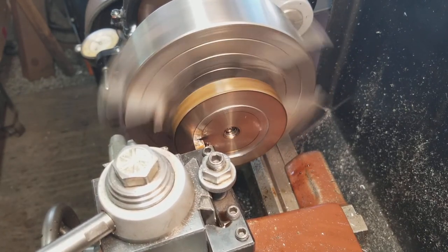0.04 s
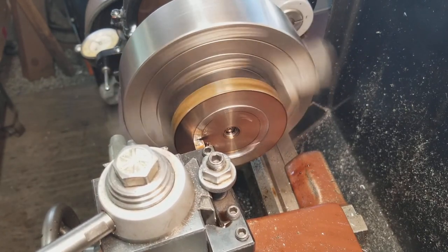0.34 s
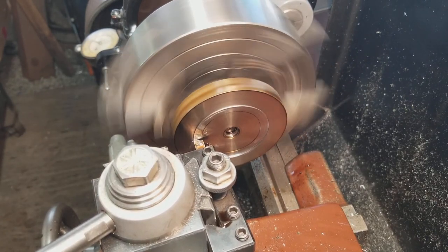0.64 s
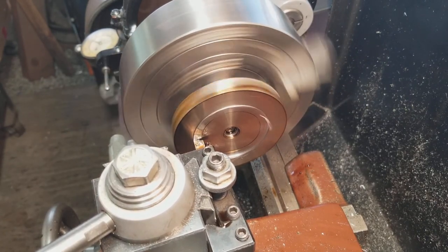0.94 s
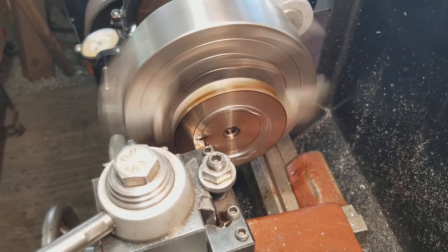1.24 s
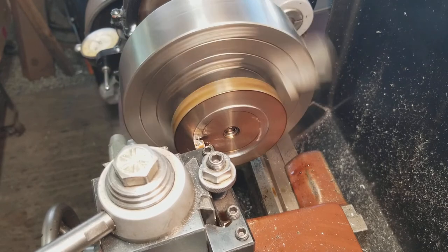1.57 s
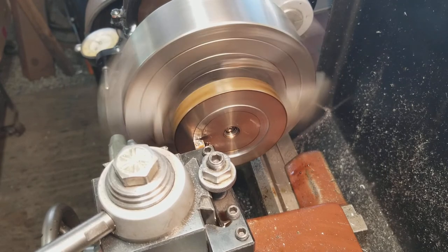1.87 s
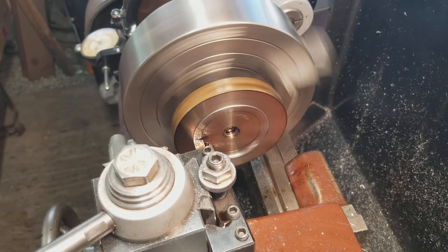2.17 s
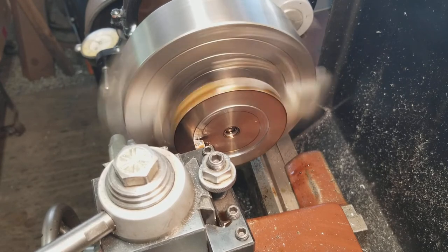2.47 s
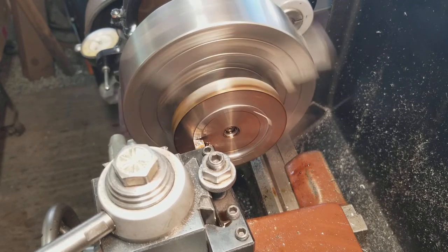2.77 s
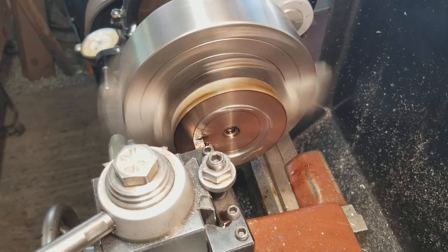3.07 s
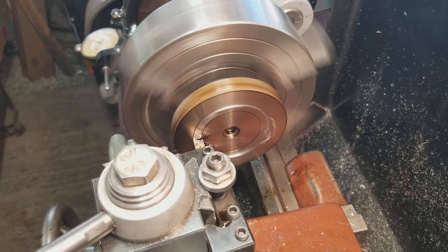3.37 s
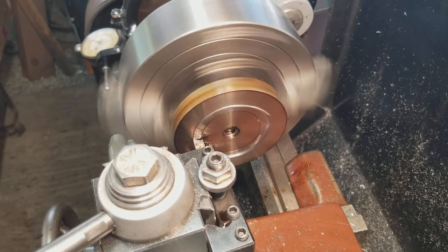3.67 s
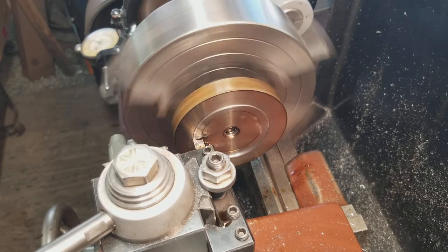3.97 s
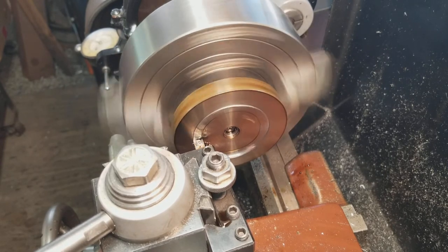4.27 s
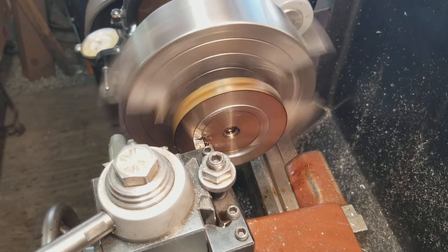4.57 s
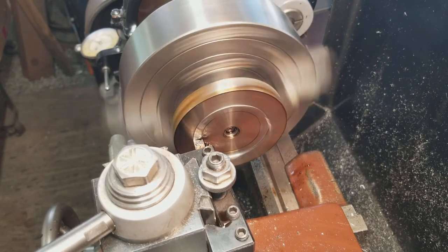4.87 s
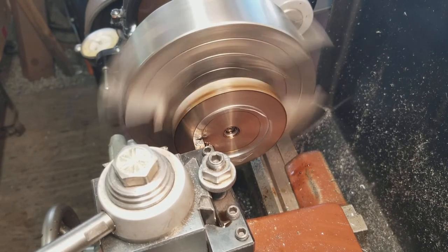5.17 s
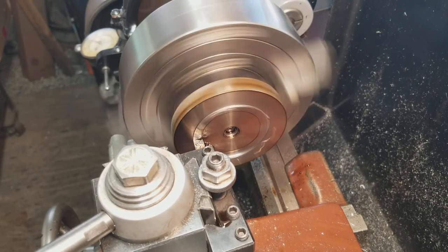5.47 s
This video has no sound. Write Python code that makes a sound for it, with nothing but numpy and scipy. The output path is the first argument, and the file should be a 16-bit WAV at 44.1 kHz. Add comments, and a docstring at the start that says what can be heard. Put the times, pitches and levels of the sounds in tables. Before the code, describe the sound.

Close to a running metal lathe, a throbbing gear drone and harsh rattle start loud, ease off and surge three more times. Over a steady motor hum, the cutting tool makes a pulsing hiss and small, thin squeals against the turning metal. A sheet-metal guard rings faintly and loose panels boom softly, and a faint deep rumble passes late on as the machine keeps running.

```python
"""A throbbing gear drone and a harsh rattle of teeth open on a belt-driven metal lathe, heard from just
above the tool post. The headstock gears swell under load about every second and a half, their teeth
knocking and clashing in the casting, while the motor hums underneath. The tool takes a light cut on a
spinning disc: the chip hisses and catches once a turn, alternately harder and softer, and the edge squeals.
The belt's joint sets the guard ringing, loose panels boom, and late on a deep rumble passes."""
import sys
import numpy as np
from scipy import signal
from scipy.fft import rfft, irfft
from scipy.io import wavfile
from scipy.ndimage import uniform_filter1d

SR = 44100
rng = np.random.default_rng(int(sys.argv[2]) if len(sys.argv) > 2 else 0)


def digitize_waveform(pressure):
    """Quantize a signal to 16-bit integers and store it at the path in sys.argv[1].

    Rows of a 2-D input are taken as channels; values are limited to [-1, 1].
    """
    field = np.atleast_2d(pressure).T
    bounded = np.clip(field, -1, 1)
    quanta = np.round(bounded * 32767).astype(np.int16)
    wavfile.write(sys.argv[1], SR, quanta)


N = 243873
TIME = np.arange(N) / SR
FREQS = np.maximum(np.fft.rfftfreq(N, 1 / SR), 1)
LEFT_RIGHT = np.array([[1], [-1]])
BELT_HZ, BELT_TIGHT_S = 7.15, 3.335  # rounds a second; a moment of greatest pull
TUG_LAG_S = 0.105  # the pull reaches gears and tool this much later
RATTLE_LIGHT_DB = -1.4  # rattle and guard sit lower while the tool skims

# The gears come under load. Each row: full from and until in seconds, lift in dB, release in seconds.
LOAD_SWELLS = [(0, 0.117, 9, 0.21), (1.505, 1.698, 7, 0.45), (2.954, 3.143, 8.2, 0.34),
               (4.604, 4.685, 7.5, 0.35)]
# The drone stumbles and comes back a cycle ahead.
# Each row: time in seconds, half length in seconds, gain at mid-stumble in dB.
DRONE_STUMBLES = [(0.634, 0.0051, -7), (0.968, 0.013, -15), (1.126, 0.015, -1), (1.271, 0.0071, 3.5),
                  (2.682, 0.0045, 5), (2.834, 0.0056, -9), (4.347, 0.0057, -17), (5.469, 0.012, -27)]
# The drone ducks briefly. Each row: time in seconds, gain in dB.
DRONE_DIPS = [(.46, -7), (.67, -13), (.815, -18), (2.41, -3), (2.68, -2), (3.73, -3.5), (4.19, -4.5),
              (5.11, -7), (5.29, -7.5)]
# Overtones of the tooth rate.
# Each row: multiple, level against the drone at full swell in dB, side minus mid in dB.
GEAR_OVERTONES = [(2, -22, -7), (3, -25, -3), (4, -49, 17), (5, -38.5, 3)]
# Resonances of casting, chuck and guard. Each row: pitch in Hz, width in Hz, lift in dB.
BODY_MODES = [(340, 30, 4), (445, 40, 5), (610, 30, 4), (660, 40, 5), (853, 36, 8), (1036, 35, 3),
              (1105, 40, 5), (1525, 70, 4), (1940, 120, 4), (2217, 70, 3), (2363, 60, 2), (2611, 65, 6),
              (2867, 55, 6), (3060, 60, 3), (3170, 70, 4), (3794, 45, 3)]
# Resonances of the tool and its holder. Each row: pitch in Hz, width in Hz, lift in dB.
TOOL_MODES = [(5835, 130, 13), (6480, 390, 11.5), (8176, 370, 17), (12100, 500, 5), (14000, 160, 8)]
# Resonances of the sheet-metal guard. Each row: pitch in Hz, width in Hz, relative level in dB.
GUARD_MODES = [(1884, 190, -4), (2608, 57, 2), (2848, 97, 2.5)]
# Tone colours of knocking teeth, bearings, chip and clashes. Each row: frequency in Hz, gain in dB.
RATTLE_EQ = [(180, -15), (300, 8.5), (400, 4), (540, 2), (780, -1.5), (1080, -2), (1220, -7), (1700, -5),
             (3100, -10), (3600, -13), (5500, -20), (7500, -21.5), (9200, -32.5), (15000, -33)]
BEARING_EQ = [(20, -16), (45, -11), (70, -2), (100, 2.5), (170, -7), (245, 8.5), (290, 5.5), (380, 1),
              (520, -10.5), (1000, -18), (1400, -16.5), (2800, -18.5), (4000, -31), (9000, -29)]
CHIP_EQ = [(1500, -22), (3000, -11), (4500, 5.5), (6000, 0), (7500, -4.5), (8400, -5), (9200, -20),
           (10000, -1.5), (11200, 5.5), (12500, 4.5), (14000, 3), (15600, 4.5)]
CLASH_EQ = [(250, -2), (560, 0), (850, 8), (1250, -5), (2000, -0.5), (2700, -3.5), (3200, -1), (3800, -10),
            (6000, -14.5), (9200, -24), (15000, -33)]
# The machine's stereo width. Each row: frequency in Hz, side minus mid in dB.
STEREO_WIDTH = [(30, -4), (90, -8), (200, -17), (330, -7.5), (480, -5), (640, 8.5), (850, -3), (1300, 3.5),
                (2200, -0.5), (8000, 0.5), (12000, 0.5)]
# Where its sound leans. Each row: frequency in Hz, left minus right in dB.
STEREO_LEAN = [(30, -5), (70, -3.5), (150, -9), (330, 5), (650, 4), (1300, -3), (2600, 3.5), (5500, 1),
               (8500, -1.5), (13000, -0.5)]
# Hums of motor and shafts, and at 244.6 Hz a rough, wavering hum of the casting just above the drone.
# Each row: pitch in Hz, level in dB, side minus mid in dB, unsteadiness from 0 to 1.
HUM_TONES = [(99.6, -49, -21, 0.8), (122.4, -39, -5.5, 0.31), (125, -55, -10, 0.4),
             (145.8, -47.5, -20, 0.5), (244.6, -33, -18, 0.7), (267, -35.5, -24, 0.58), (336, -44.5, -5, 1)]
# The tool catches once a turn, alternately harder and softer.
# Each row: seconds into the two-turn pattern, lift of the hiss in dB, half length in seconds.
TOOL_CATCHES = [(.022, 6, .011), (.223, 4.6, .007)]
# The tool edge sings out. Each row: start in seconds, length in seconds, level in dB.
EDGE_SQUEALS = [(0.004, 0.09, -50), (0.142, 0.066, -49), (0.637, 0.057, -48), (0.724, 0.093, -47.5),
                (1.191, 0.044, -48), (1.335, 0.081, -45), (1.492, 0.063, -48), (1.597, 0.11, -48),
                (1.74, 0.104, -51), (1.87, 0.095, -47), (2.024, 0.052, -47), (2.095, 0.07, -49),
                (2.179, 0.068, -44.5), (2.25, 0.06, -47), (2.324, 0.047, -46), (2.464, 0.036, -45),
                (2.71, 0.06, -54), (2.778, 0.067, -49), (2.864, 0.078, -52), (2.975, 0.22, -51),
                (4.122, 0.05, -48), (4.442, 0.038, -51), (4.598, 0.184, -52), (5.112, 0.054, -47)]
# Short, harsh bursts from the teeth. Each row: time in seconds, peak in dB before the trim.
TOOTH_CLASHES = [(0.024, -14), (0.145, -21), (0.744, -28.5), (0.93, -30), (1.217, -27), (1.375, -21.5),
                 (1.506, -21), (1.63, -16), (1.759, -19), (2.285, -25), (2.756, -23.5), (2.94, -15.5),
                 (3.021, -18), (3.155, -16), (3.664, -30.5), (4.196, -28.5), (4.461, -18.5), (4.693, -14.5),
                 (5.4, -31)]
# A deep rumble passes. In order: full from and until in seconds, fade in seconds, level in dB.
PASSING_GROWL = (3.85, 4.3, 2, -53)


def undb(db):
    """Decibels to gain."""
    return 10 ** (np.asarray(db) / 20)


def unit(x):
    """Scale to rms 1."""
    return x / np.sqrt(np.mean(np.abs(x) ** 2))


def eq_curve(points):
    """A table of Hz and dB as a gain at every frequency."""
    hz, db = np.transpose(points)
    return undb(np.interp(np.log(FREQS), np.log(hz), db))


def walk(rate):
    """A smooth random drift of rms 1 that changes about rate times a second."""
    return unit(irfft(rfft(rng.standard_normal(N)) / (1 + (FREQS / rate) ** 4), N))


def bumps(table, half_s):
    """Rounded rises or falls, one for each row of time and height."""
    return sum(height * np.exp(-((TIME - s) / half_s) ** 2) for s, height in table)


def gate(start, end, attack_s, release_s):
    """An envelope from 0 to 1: rises until start, holds, and falls after end."""
    return np.clip(np.minimum(1 + (TIME - start) / attack_s, 1 - (TIME - end) / release_s), 0, 1)


def place(tone, side_db):
    """Spread a complex tone across left and right as a standing wave."""
    return np.sqrt(2) * (tone.real + LEFT_RIGHT * undb(side_db) * tone.imag)


def grains(per_s, spread_db):
    """Tiny impacts of differing size; mid and side share part of each."""
    struck = rng.random(N) < per_s / SR
    push = rng.standard_normal(N) + rng.standard_normal((2, N))
    return unit(struck * push * undb(spread_db * rng.standard_normal(N)))


def scatter(force, t60, wet_db, spacing_hz, ripple_db):
    """Reflections off the bed and guard smear each impact; countless small modes ripple the treble."""
    tail = rng.standard_normal((2, N)) * undb(-60 * TIME / t60) * np.sqrt(np.log(1e6) / (t60 * SR))
    response = np.array([[1], [0]]) + undb(wet_db) * rfft(tail)  # only the mid has a direct path
    ripple = unit(uniform_filter1d(rng.standard_normal(response.shape), int(spacing_hz * N / SR) + 1))
    gain = undb(ripple_db * ripple * FREQS / (FREQS + 700))  # smoother in the bass, where modes are few
    return irfft(rfft(force) * gain * response / np.abs(response), N)


def radiate(force, eq, modes, band_hz):
    """Mid and side forces ring a resonant part in stereo, scaled by the mid's rms within band_hz."""
    lift_db = sum(db / (1 + (2 * (FREQS - hz) / width) ** 2) for hz, width, db in modes)
    mid, side = rfft(force) * eq_curve(eq) * undb(lift_db)
    band_rms = np.std(irfft(mid * (FREQS > band_hz[0]) * (FREQS < band_hz[1]), N))
    stereo = mid + LEFT_RIGHT * side * eq_curve(STEREO_WIDTH)
    return irfft(stereo * eq_curve(STEREO_LEAN) ** (LEFT_RIGHT / 2), N) / band_rms


def load_db(rise_s=0.48):
    """How far the load on the gears lifts their sound."""
    return sum(db * gate(start, end, rise_s, release) for start, end, db, release in LOAD_SWELLS)


def light_cut(deeper_at_s=1.16, over_s=0.063):
    """1 while the tool only skims, 0 once it has settled into a deeper cut."""
    return 1 - np.clip((TIME - deeper_at_s) / over_s, 0, 1)


def belt_pull(lag_s=0):
    """The belt tugs once a round, from -1 to 1."""
    return np.cos(2 * np.pi * BELT_HZ * (TIME - BELT_TIGHT_S - lag_s))


def gear_throb(beat_hz=6.52, peak_s=2.904, max_depth=0.56, deepest_s=2.652, period_s=1.54):
    """A slightly higher gear tone beats with the first: a complex gain, deepest as each swell builds."""
    depth = max_depth * np.exp(np.cos(2 * np.pi * (TIME - deepest_s) / period_s) - 1)
    return 1 + depth * np.exp(2j * np.pi * beat_hz * (TIME - peak_s))


def gear_motion(mesh_hz=219.7, wow_hz=3.9, jitter_hz=1.348, flutter=0.11):
    """The gears' vibration as a complex tone: the belt bends its pitch, and it throbs and stumbles."""
    hz = mesh_hz + wow_hz * belt_pull() + jitter_hz * walk(22.5)
    motion = np.exp(2j * np.pi * np.cumsum(hz) / SR) * gear_throb()
    for s, half_s, db in DRONE_STUMBLES:
        progress = (TIME - s) / half_s
        motion = motion * (progress - 1j * undb(db)) / (progress + 1j)
    # no two teeth are alike, so the tone flutters
    return motion * (1 + flutter * (walk(45.6) + 1j * walk(25)))


def gear_drone(motion, rest_db=-19, full_db=-10, light_db=-1.7, right_db=2.1):
    """Meshing teeth drone a little to the right; their flickering overtones brighten under load."""
    load = load_db()
    waver_db = undb(-load) * walk(9.3)  # slack gears waver; load steadies them
    level_db = rest_db + light_db * light_cut() + load + bumps(DRONE_DIPS, half_s=0.022) + waver_db
    brightness_db = 0.39 * (level_db - full_db)
    tone = place(motion, side_db=-18)
    for multiple, db, side_db in GEAR_OVERTONES:
        flicker = 1 + 0.35 * (walk(14) + 1j * walk(14))
        overtone = np.exp(1j * multiple * np.angle(motion)) * flicker
        tone = tone + undb(db + brightness_db) * place(overtone, side_db)
    return tone * undb(level_db - LEFT_RIGHT * right_db / 2)


def gear_rattle(motion, rest_db=-38, load_share=0.97):
    """Teeth knock through their backlash and ring the casting, harder as shake and load grow."""
    level_db = rest_db + RATTLE_LIGHT_DB * light_cut() + load_share * load_db()
    uneven = undb(0.27 * walk(85) + 0.47 * walk(37) - 0.2 * belt_pull(TUG_LAG_S))
    tooth_pulse = np.exp(0.053 * np.cos(np.angle(motion)))  # a slight accent once a cycle
    contact = np.abs(motion) ** 0.59 * tooth_pulse * uneven
    knocks = contact * grains(per_s=6000, spread_db=1.5)
    smeared = scatter(knocks, t60=0.046, wet_db=0.5, spacing_hz=13, ripple_db=2)
    return radiate(smeared, RATTLE_EQ, BODY_MODES, band_hz=(600, 3600)) * undb(level_db)


def machine_hum(rumble_db=-37, throb_db=1.2, light_db=-1.5):
    """Motor, shafts and casting hum unsteadily over bearing rumble, softer while the tool skims."""
    rolling = rng.standard_normal((2, N)) * undb(throb_db * walk(24))
    hum = undb(rumble_db) * radiate(rolling, BEARING_EQ, BODY_MODES, band_hz=(20, 1000))
    for hz, db, side_db, unsteady in HUM_TONES:
        wobble = 1 - unsteady + unsteady * (walk(12.3) + 1j * walk(10.8))
        tone = unit(np.exp(2j * np.pi * hz * TIME) * wobble)
        lean_db = np.interp(hz, *np.transpose(STEREO_LEAN))
        hum = hum + undb(db + LEFT_RIGHT * lean_db / 2) * place(tone, side_db)
    return hum * undb(light_db * light_cut())


def chip_hiss(rest_db=-51, light_db=-1.5, load_share=0.21, flicker_db=0.9, two_turns_s=0.4208):
    """The chip tears off in tiny fractures; once a turn the tool catches and the hiss flares."""
    level_db = rest_db + light_db * light_cut() + load_share * load_db() + flicker_db * walk(70)
    for s, db, half_s in TOOL_CATCHES:
        apart_s = (TIME - s + two_turns_s / 2) % two_turns_s - two_turns_s / 2
        bite_db = db * np.exp(-(apart_s / half_s) ** 2)
        shoulder_db = 1.5 * np.exp(-(apart_s / 0.11) ** 2)  # the cut deepens gently around the catch
        level_db = level_db + bite_db + shoulder_db
    fractures = grains(per_s=6000, spread_db=-1.5)
    smeared = scatter(fractures, t60=0.048, wet_db=-1, spacing_hz=60, ripple_db=2)
    return radiate(smeared, CHIP_EQ, TOOL_MODES, band_hz=(10500, 15500)) * undb(level_db)


def tool_squeal(hz=4236, waver_hz=14, faint_db=-58, stutter_db=4, tug_db=2, flicker_db=2, fade_s=0.022):
    """The rubbing edge sings thinly: a faint stutter that pulses with the belt, and louder squeals."""
    envelope = undb(faint_db + stutter_db * walk(19) + tug_db * belt_pull(TUG_LAG_S))
    for start, length, db in EDGE_SQUEALS:
        held = gate(start + fade_s / 2, start + length - fade_s / 2, fade_s, fade_s)
        envelope = np.maximum(envelope, undb(db) * held ** 2)
    tone = np.exp(2j * np.pi * np.cumsum(hz + waver_hz * walk(60)) / SR)
    return place(tone, side_db=-8) * envelope * undb(flicker_db * walk(24))


def gear_clashes(trim_db=-9):
    """Harder blows between the teeth ring the casting more brightly."""
    blows = grains(per_s=7000, spread_db=0.6)
    smeared = scatter(blows, t60=0.045, wet_db=0, spacing_hz=30, ripple_db=1)
    casting = radiate(smeared, CLASH_EQ, BODY_MODES, band_hz=(600, 3600))
    return casting * bumps([(s, undb(db + trim_db)) for s, db in TOOTH_CLASHES], half_s=0.028)


def guard_ring(ring_db=-40, load_share=0.26, vary_db=1, joint_lag_s=0.079):
    """Once a round, after the greatest pull, the belt's joint scuffs past and the guard rings briefly."""
    first_s = (BELT_TIGHT_S + joint_lag_s) % (1 / BELT_HZ)
    scuffs = bumps([(s, 1) for s in np.arange(first_s, N / SR, 1 / BELT_HZ)], half_s=0.029)
    modes = sum(undb(db) / (1 + 2j * (FREQS - hz) / width) ** 2 for hz, width, db in GUARD_MODES)
    ring = unit(irfft(rfft(rng.standard_normal((2, N))) * modes, N))
    level_db = ring_db + RATTLE_LIGHT_DB * light_cut() + load_share * load_db() + vary_db * walk(7.4)
    return ring * scuffs * undb(level_db)


def panel_boom(hz=345, wander_hz=16, level_db=-46, spread_db=4):
    """Loose panels boom at odd moments, wandering in pitch."""
    tone = np.exp(2j * np.pi * np.cumsum(hz + wander_hz * walk(14.1)) / SR)
    return place(tone, side_db=-12) * undb(level_db + spread_db * walk(14))


def deep_growl(hz=80):
    """A low, rough rumble fades slowly in and starts to ebb."""
    start, end, fade_s, db = PASSING_GROWL
    rumble = unit(np.exp(2j * np.pi * hz * TIME) * (walk(18) + 1j * walk(18)))
    return place(rumble, side_db=-6) * gate(start, end, fade_s, fade_s) * undb(db)


def scene():
    """The mix: gears up front, then guard and cut, with the machine's low end underneath."""
    motion = gear_motion()
    gears = gear_drone(motion) + gear_rattle(motion) + gear_clashes()
    return gears + guard_ring() + chip_hiss() + tool_squeal() + deep_growl() + panel_boom() + machine_hum()


def record(dry, top_hz=15600):
    """A steep low-pass takes the air off the top."""
    return signal.sosfilt(signal.ellip(10, 0.1, 80, top_hz, fs=SR, output="sos"), dry)


dry = scene()
out = record(dry)
digitize_waveform(out)
```